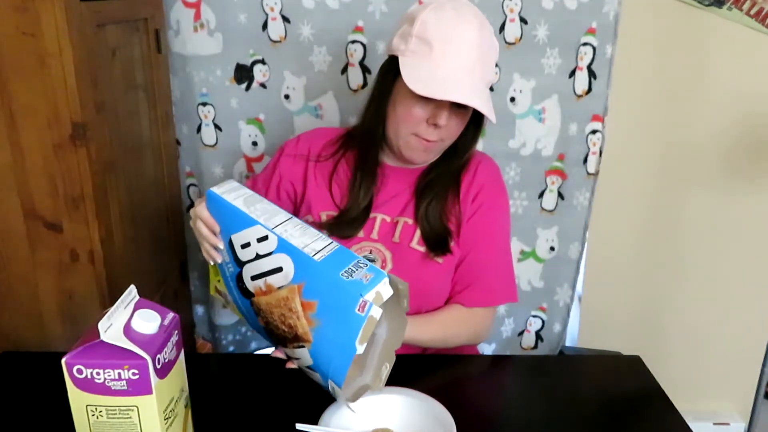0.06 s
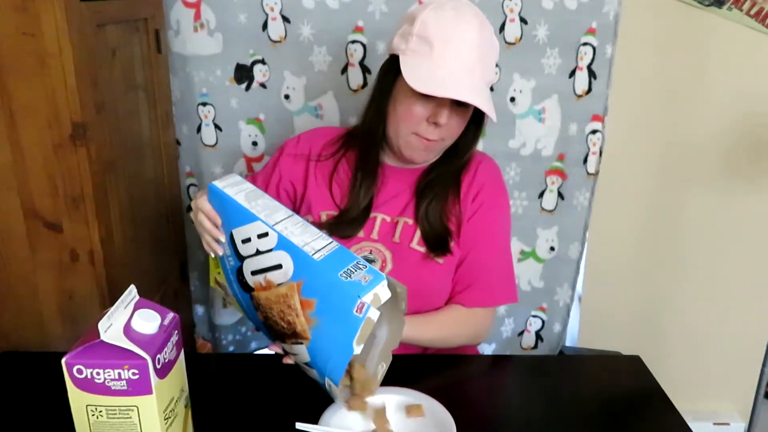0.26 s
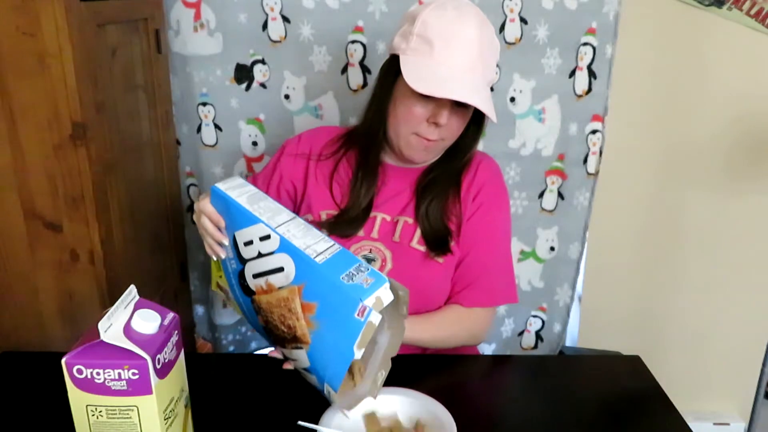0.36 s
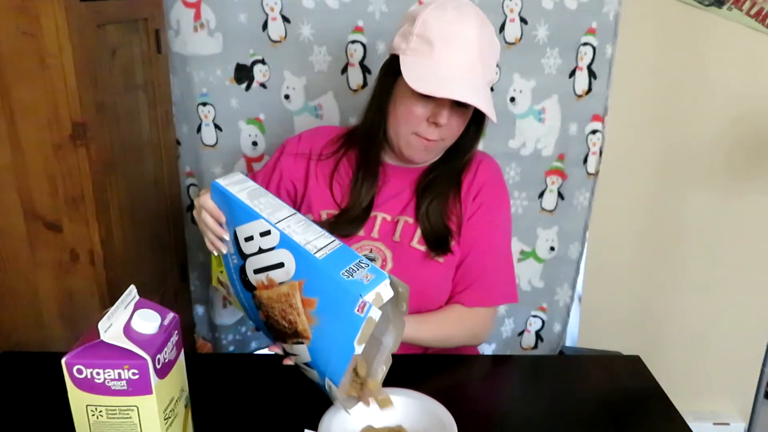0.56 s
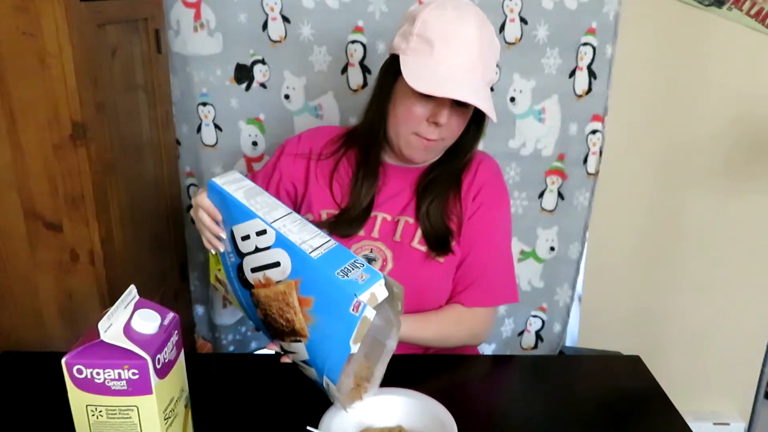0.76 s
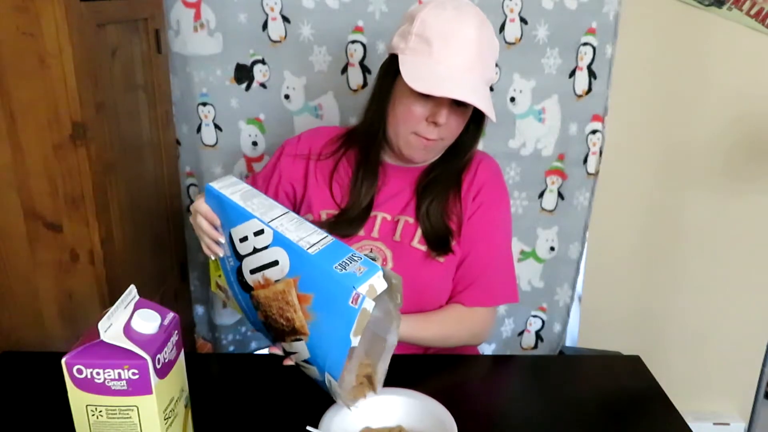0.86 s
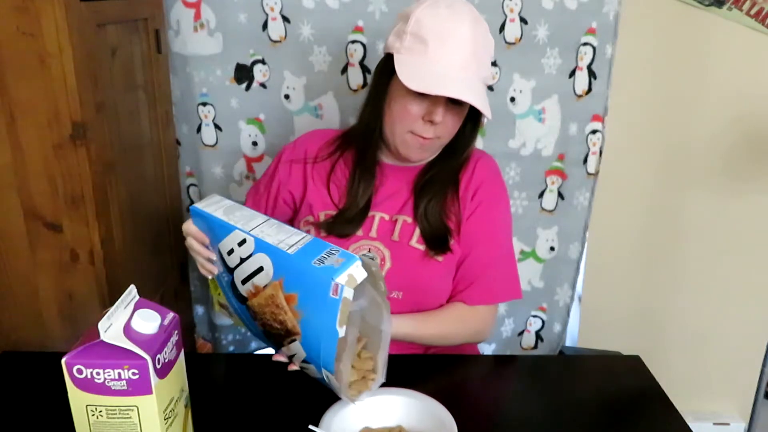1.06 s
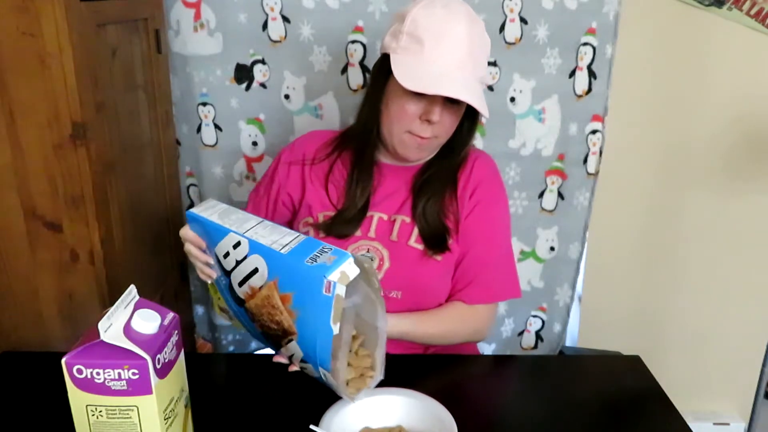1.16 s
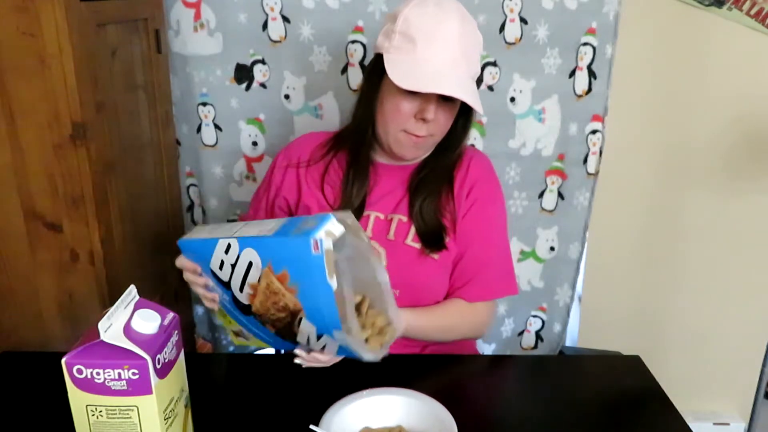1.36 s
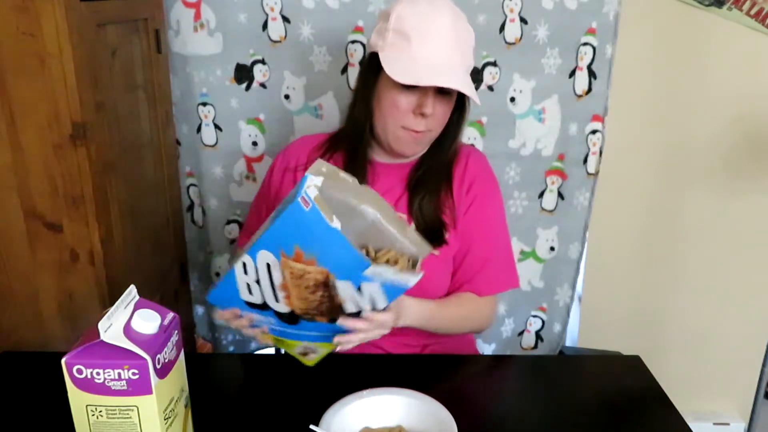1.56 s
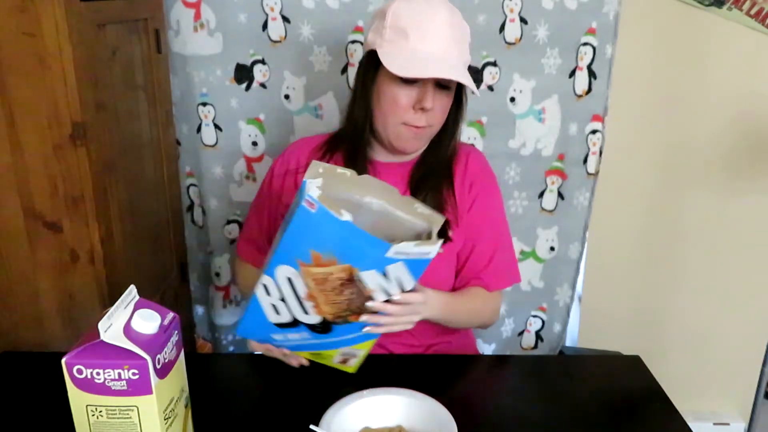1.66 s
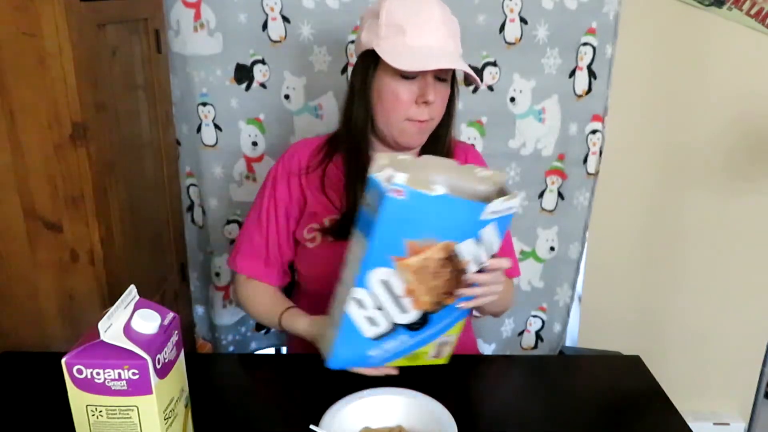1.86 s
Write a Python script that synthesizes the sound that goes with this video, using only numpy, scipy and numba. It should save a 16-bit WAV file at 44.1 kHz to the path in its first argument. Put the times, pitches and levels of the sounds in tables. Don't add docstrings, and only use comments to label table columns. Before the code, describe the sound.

Cereal pours into a bowl: a brief slide, a dense ringing clatter with table thuds, sparser pieces, a faint spoon chink, then a cardboard rattle as the box tips back, heard about a metre away indoors.

```python
import sys
import numpy as np
from scipy import signal
from scipy.fft import rfft, irfft
from scipy.io import wavfile
from numba import njit

SR = 44100
rng = np.random.default_rng(int(sys.argv[2]) if len(sys.argv) > 2 else 0)


def rack_gain(trim_db):
    fader = np.asarray(trim_db, float)
    return 10 ** (fader / 20)


def unload_wav(signal):
    wavfile.write(
        sys.argv[1],
        SR,
        np.round(np.clip(np.atleast_2d(signal).T, -1, 1) * 32767).astype(np.int16),
    )


N = 83790

# (frequency [Hz], level [dB], t60 [s])
BOWL_MODES = [(628, 3.5, 0.025), (910, -1, 0.092), (1037, -1.5, 0.14), (1140, -2.5, 0.078),
              (1311, -4.5, 0.089), (680, -3, 0.011), (1703, 1.5, 0.066), (1846, 0.5, 0.074),
              (2010, 4.5, 0.033), (2174, 0.5, 0.047), (2370, 4.5, 0.035), (2650, 0.5, 0.059),
              (2886, 1, 0.021), (3390, -12, 0.059)]


def level(x, db):
    return x * rack_gain(db) / np.sqrt(np.mean(x ** 2))


def curve(table, edge_s=0.0069):
    s, db = np.array(table).T
    s = np.r_[s[0] - edge_s, s, s[-1] + edge_s]
    return rack_gain(np.interp(np.arange(N) / SR, s, np.r_[-120, db, -120]))


def colour(x, table):
    hz, db = np.array(table).T
    f = np.maximum(np.fft.rfftfreq(x.shape[-1], 1 / SR), 1)
    gain = rack_gain(np.interp(np.log(f), np.log(hz), db))
    return irfft(rfft(x) * gain, x.shape[-1])


def clicks(s, size):
    return np.bincount(np.clip(s * SR, 0, N - 1).astype(int), size, N)


@njit
def add(out, start, turn, fall, size):
    for j in range(len(start)):
        z, p = size[j], np.exp(1j * turn[j] - fall[j])
        for i in range(start[j], min(len(out), start[j] + int(5.5 / fall[j]))):
            out[i] += z.imag
            z *= p
    return out


def ring(modes, s, db, centre_hz=None, depth_db=8, detune=0.014, scatter_db=1.5):
    contact_s, colour_oct = 0.0008, 0.35
    hz, mode_db, t60_s = np.array(modes, float).T
    chance = rng.standard_normal((len(s), 2, len(modes)))
    strength, shift = chance[:, 0], chance[:, 1]
    gain_db = db[:, None] + mode_db + scatter_db * strength
    if centre_hz is not None:
        away_oct = np.log2(hz / centre_hz[:, None])
        gain_db = gain_db + depth_db * (np.exp(-(away_oct / colour_oct) ** 2) - 1)

    def flat(v):
        return (v + 0 * gain_db).ravel()

    start = flat((s[:, None] + contact_s * np.abs(shift)) * SR).astype(np.int64)
    turn = flat(2 * np.pi * hz * (1 + detune * shift) / SR)
    fall = flat(np.log(1000) / (np.maximum(t60_s, 0.005) * SR))
    size = (rack_gain(gain_db) * np.sign(shift)).ravel() + 0j
    return add(np.zeros(N), start, turn, fall, size)


def swarm(count, spread_db):
    c = rng.random((count, 2))
    s = (np.arange(count) + 3 * c[:, 0]) / count * N / SR
    db = np.minimum(-spread_db * np.log(1 - c[:, 1]), 4 * spread_db)
    return s, db


def crunch(s, db, smear_s):
    # (frequency [Hz], density [dB per Hz])
    spectrum = [(180, -55), (300, -3), (574, -6), (870, -5.5), (1230, -1), (2170, -7), (4230, -21),
                (9390, -25), (16000, -40)]
    env = signal.lfilter([1], [1, -np.exp(-1 / (smear_s * SR))], clicks(s, rack_gain(db)))
    return colour(env * rng.standard_normal(N), spectrum)


def reverb(x, t60_s, count=5):
    # (frequency [Hz], gain [dB])
    dull = [(3000, 0), (9000, -6)]
    shift_s, onset_s = 0.045, 0.0029
    t, turn = np.arange(SR // 3) / SR, np.arange(N) / SR / shift_s
    tails = rng.standard_normal((count, len(t))) * rack_gain(-60 * t / t60_s) * np.clip(t / onset_s, 0, 1)
    tails = colour(level(tails, 0) / np.sqrt(len(t)), dull)
    phase = (turn - np.arange(count)[:, None]) % count
    share = np.sqrt(np.clip(1 - np.abs(phase - 1), 0, 1))
    return signal.fftconvolve(share * x, tails, axes=1).sum(axis=0)[:N]


def air():
    # (frequency [Hz], gain [dB])
    room_tone = [(76, -9.5), (130, 2), (500, -7.5), (1500, -16), (4700, -27.5), (13300, -41.5),
                 (16000, -68)]
    # (time [s], level [dB])
    handling = [
        (0, -55),
        (.3, -62),
        (.55, -58),
        (.8, -67),
        (.95, -57),
        (1.1, -55),
        (1.3, -46.5),
        (1.48, -49),
        (1.6, -55),
        (1.9, -53),
    ]
    n = rng.standard_normal((3, N))
    tone = level(colour(n[0], room_tone), -44)
    hum_hz, hum_q = 112, 12.0
    hum = level(signal.lfilter(*signal.iirpeak(hum_hz, hum_q, fs=SR), n[1]), -59)
    rumble = level(colour(n[2], [(15, 11), (30, 0.5), (60, 14), (110, -33.5)]), 0)
    return tone + hum + rumble * curve(handling)


def liner():
    # (time [s], level [dB])
    flex = [
        (.69, -64),
        (.72, -57),
        (.77, -57),
        (.81, -83),
        (1.47, -82),
        (1.55, -51),
        (1.63, -59),
        (1.72, -69),
        (1.9, -73),
    ]
    ticks = crunch(*swarm(count=1200, spread_db=3.5), smear_s=0.00092)
    highpass = signal.butter(2, 6000, "high", fs=SR, output="sos")
    return curve(flex) * level(signal.sosfilt(highpass, ticks), 0)


def box():
    # (frequency [Hz], level [dB], t60 [s])
    modes = [(215.5, -4.5, 0.079), (265, -5, 0.043), (430, 0.5, 0.037), (802, -0.5, 0.018),
             (1290, -11, 0.019), (1480, -10, 0.011), (1940, 2, 0.012), (2750, -2, 0.021)]
    # (time [s], level [dB])
    slide_in = [
        (0, -41),
        (.06, -44),
        (.095, -57),
        (.135, -37),
        (.165, -42),
        (.2, -41),
        (.24, -65),
    ]
    # (time [s], level [dB])
    slide_back = [(1.3, -60), (1.38, -47), (1.43, -54), (1.49, -48), (1.55, -39), (1.615, -37.5),
                  (1.645, -33), (1.68, -36.5), (1.72, -35), (1.765, -43), (1.815, -38.5), (1.86, -41.5),
                  (1.9, -43.5)]
    # (time [s], peak level [dB], colour [Hz])
    knocks = [(0.123, -25.5, 700), (1.37, -21, 520), (1.384, -31, 450), (1.500, -34, 1900),
              (1.509, -31, 1630), (1.572, -24, 1100), (1.632, -16.5, 1520), (1.646, -27, 430),
              (1.697, -22, 1500), (1.712, -21, 1700), (1.737, -16, 854), (1.772, -17.5, 430),
              (1.791, -21, 886), (1.81, -17, 890), (1.839, -18, 960), (1.879, -19, 430)]
    s, db = swarm(count=3000, spread_db=1.0)
    flow = curve(slide_in) + curve(slide_back)
    rattle = level(ring(modes, s, db, detune=0.1254), -2.4)
    grit = level(crunch(s, db, smear_s=0.0015), 0)
    knock_s, knock_db, knock_hz = np.array(knocks).T
    knocking = ring(modes, knock_s, knock_db - 11, knock_hz) + crunch(knock_s, knock_db, smear_s=0.0019)
    boom = ring([(228, 0, 0.2)], np.array([0, 0.056]), np.array([-29.0, -35.0]), scatter_db=0)
    return flow * (rattle + grit) + knocking + boom


def table_thuds():
    # (frequency [Hz], level [dB], t60 [s])
    modes = [(128, -17, 0.053), (289, -2.5, 0.037), (413, -9.5, 0.04), (528, 4.5, 0.022), (655, 2.5, 0.028)]
    # (time [s], level [dB], colour [Hz])
    thuds = [
        (.249, -18.5, 620),
        (0.351, -23, 500),
        (0.422, -14, 380),
        (.47, -19, 430),
        (.548, -11, 423),
        (.683, -11, 142),
        (0.761, -32, 403),
        (1.065, -23.5, 335),
    ]
    return ring(modes, *np.array(thuds).T, depth_db=14.5, scatter_db=2.5)


def chinks():
    # (frequency [Hz], level [dB], t60 [s])
    modes = [(3737, 0, .075), (3920, -8, .05), (4680, -15, .04), (5150, -20, .025), (5640, -2, .12),
             (6840, -16, .03), (7770, -13, .025), (8370, -1, .026), (9970, -1, .012), (11540, -2, .013)]
    # (time [s], level [dB], colour [Hz])
    strikes = [(0.247, -19, 9900), (0.246, -38, 5300), (0.347, -17.5, 3800), (0.35, -21, 5640),
               (.362, -31.5, 5640), (.349, -14, 8600), (0.361, -19.5, 3700), (0.377, -36, 5640),
               (0.394, -29, 8400), (.398, -25, 3880), (.402, -31.5, 5640), (0.428, -34, 5640),
               (.43, -28, 3900), (0.444, -44, 5640), (.462, -20, 8300), (0.463, -35, 5640),
               (.48, -33, 3800), (.546, -30.5, 4940), (0.906, -34.5, 3740), (0.908, -32, 8400),
               (1.069, -40, 8300), (1.08, -42, 8300), (1.175, -53, 9200), (1.385, -46, 9800),
               (1.736, -37, 6960)]
    # (time [s], level [dB])
    spoon = [
        (1.228, -51),
        (1.262, -55),
        (1.284, -43),
        (1.31, -51),
        (1.326, -54),
        (1.345, -54),
        (1.359, -59),
    ]
    glaze = ring(modes, *np.array(strikes).T, depth_db=17, detune=0.0015)
    spoon_hz, spoon_t60_s = 5357, 0.073
    chink = ring([(spoon_hz, 0, spoon_t60_s)], *np.array(spoon).T, detune=0.001, scatter_db=0)
    return glaze + rack_gain(3) * chink


def heap():
    # (time [s], level [dB])
    pour = [(.24, -71), (.3, -31), (.34, -35.5), (.39, -31.5), (.45, -23.5), (.52, -32.5), (.59, -28.5),
            (.635, -37.5), (.67, -33), (.76, -26.5), (.81, -39.5), (.88, -42.5), (.94, -33.5),
            (1.03, -56.5), (1.1, -36), (1.16, -48.5), (1.22, -71)]
    s, db = swarm(count=1500, spread_db=3.5)
    rattle = level(ring(BOWL_MODES, s, db, detune=0.0468), -5.5)
    grit = level(crunch(s, db, smear_s=0.0031), -0.92)
    return curve(pour) * (rattle + grit)


def pings():
    # (time [s], level [dB], frequency [Hz], t60 [s])
    notes = [(.248, -6.5, 544, 0.069), (.249, -8.5, 683, 0.044), (.249, -4.5, 1857, 0.04),
             (.250, -12, 1730, 0.05), (.252, -10, 1140, .07), (.348, -10, 2070, 0.098),
             (0.348, -15, 2680, 0.071), (.362, -17, 937, 0.13), (.365, -19, 1790, .08),
             (0.404, -20, 2740, 0.044), (.427, -13, 1974, 0.11), (0.428, -12.5, 2817, 0.074),
             (0.438, -13, 1390, 0.093), (.447, -10.5, 1057, 0.093), (0.461, -17, 1706, 0.04),
             (0.469, -21, 2650, .06), (.544, -18, 2700, 0.043), (.546, -10, 2070, 0.033),
             (.551, -13.5, 1022, .06), (.575, -23, 1120, 0.072), (.59, -19, 2390, 0.044),
             (.662, -21, 2010, 0.036), (0.684, -16.5, 1850, 0.054), (.69, -15, 890, 0.044),
             (0.701, -9.5, 1863, 0.046), (0.708, -14.5, 1738, .06), (.715, -19, 2140, .06),
             (0.759, -29, 1890, 0.037), (0.883, -31, 1497, 0.059), (.905, -9.5, 2146, 0.05),
             (.914, -10, 2233, 0.043), (.924, -14.5, 2130, 0.034), (0.909, -25, 1480, 0.1),
             (.96, -33, 2080, .09), (1.065, -13.5, 1830, 0.053), (1.07, -18.5, 857, 0.045),
             (1.083, -20.5, 866, .05), (1.083, -30, 1730, .12), (1.10, -28, 930, 0.044),
             (1.115, -31, 1870, 0.033), (1.176, -30.5, 2117, 0.047)]
    out = np.zeros(N)
    for s, db, hz, t60_s in notes:
        pair = [(hz, 0, t60_s * 0.75), (hz * 1.045, -4, t60_s * 0.74)]
        out += ring(pair, np.array([s]), np.array([db]), detune=0.0024, scatter_db=2.5)
    return rack_gain(-3.5) * out


def drops(count=5):
    # (time [s], peak level [dB], colour [Hz], crunch level [dB])
    landings = [(0.243, -12.5, 513, -22), (0.248, -2.5, 1340, -17.5), (0.348, -5.5, 2450, -19),
                (0.361, -12.5, 1920, -19), (0.376, -9, 930, -18), (0.394, -14.5, 2010, -20),
                (0.419, -10, 1190, -36), (0.426, -7, 2010, -20), (0.438, -9.5, 2010, -34),
                (0.449, -13.5, 1110, -24), (0.463, -10.5, 2020, -18.5), (0.541, -19.5, 1870, -19),
                (0.549, -11.5, 986, -21), (0.662, -22, 2010, -38), (0.681, -16, 1430, -21),
                (0.702, -13, 1800, -19), (0.744, -24.5, 1720, -11), (0.769, -26.5, 1600, -7.5),
                (0.835, -28, 910, -42), (0.905, -15.5, 2270, -20.5), (1.065, -20.5, 1740, -13),
                (1.081, -20.5, 1670, -18), (1.114, -27.5, 970, -20), (1.175, -37.5, 2100, -8.5)]
    bounce_s, bounce_db, bounce_fall_db = 0.006, -7, -2.5
    s, db, hz, crunch_db = np.array(landings).T
    gaps_s = rng.exponential(1.0, (len(s), count)) * bounce_s
    step = np.arange(count + 1)
    hit_s = (s[:, None] + np.c_[0 * s, np.cumsum(gaps_s, axis=1)]).ravel()
    hit_db = (db[:, None] + (step > 0) * bounce_db + step * bounce_fall_db).ravel()
    hit_hz, hit_crunch_db = np.repeat(hz, count + 1), np.repeat(crunch_db, count + 1)
    ringing = ring(BOWL_MODES, hit_s, hit_db - 10.5, hit_hz, detune=0.039)
    return ringing + rack_gain(22.5) * crunch(hit_s, hit_db + hit_crunch_db, smear_s=0.0031)


def scene():
    # (frequency [Hz], gain [dB])
    ports = [(60, -36), (200, -16.5), (450, -18.5), (1200, -21.5), (2400, -21), (4400, -4), (8100, -5.5),
             (15000, 11.5)]
    highpass = signal.butter(4, 110, "high", fs=SR, output="sos")
    body = signal.sosfilt(highpass, box() + table_thuds() + heap() + pings() + drops())
    near = body + rack_gain(-6.5) * reverb(body, t60_s=0.027) + chinks() + liner()
    mid = near + rack_gain(-9) * reverb(near, t60_s=0.28) + air()
    side = colour(reverb(mid, t60_s=0.032), ports)
    return np.array([mid + side, mid - side])


def band_limit(x):
    return signal.sosfilt(signal.butter(12, 16380, fs=SR, output="sos"), x)


def record(dry):
    rounded = np.tanh(0.8 * dry) / 0.8
    top_cut = signal.ellip(10, 0.2, 70, 16100, fs=SR, output="sos")
    return band_limit(signal.sosfilt(top_cut, rounded))


dry = scene()
out = record(dry)
unload_wav(out)
```